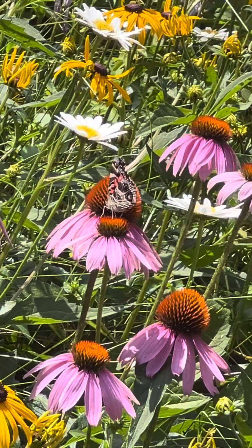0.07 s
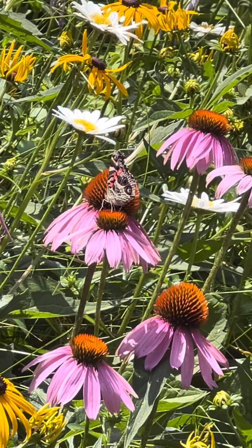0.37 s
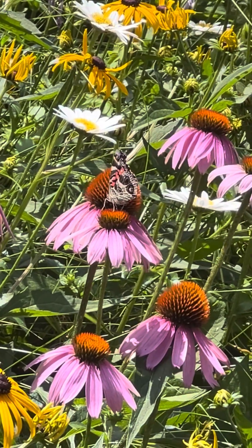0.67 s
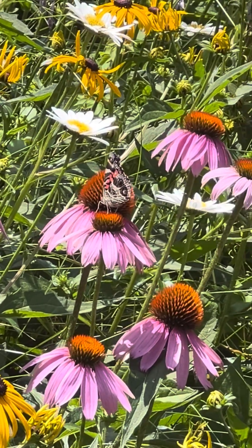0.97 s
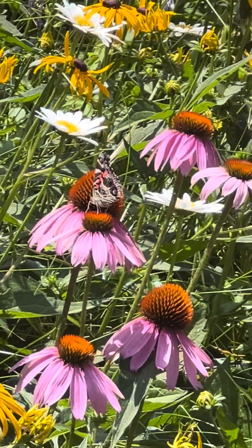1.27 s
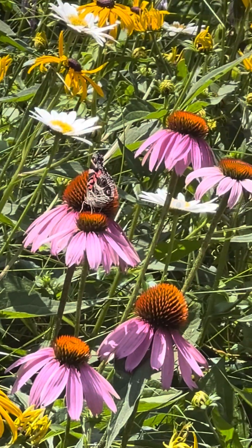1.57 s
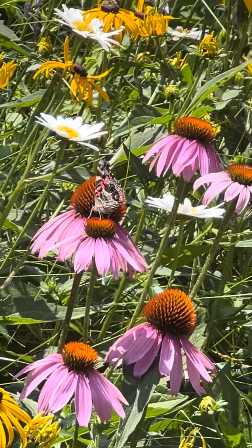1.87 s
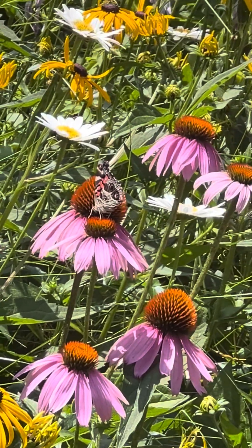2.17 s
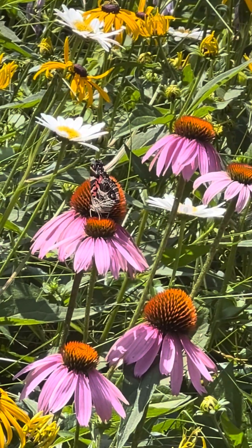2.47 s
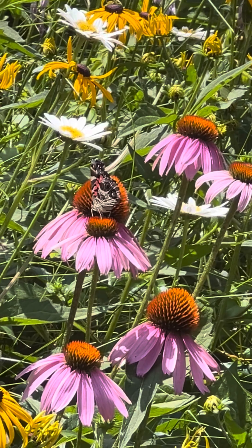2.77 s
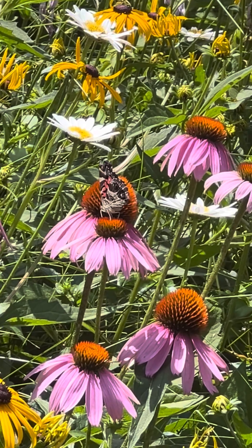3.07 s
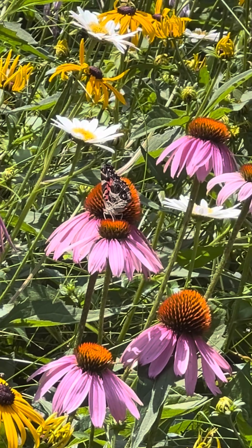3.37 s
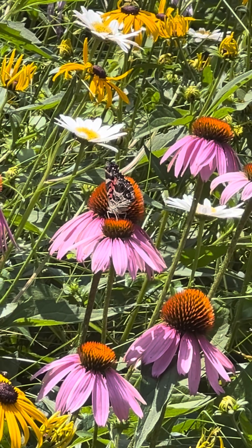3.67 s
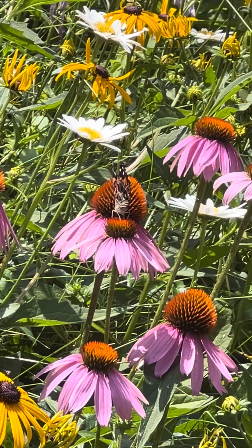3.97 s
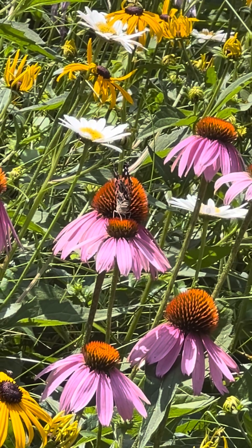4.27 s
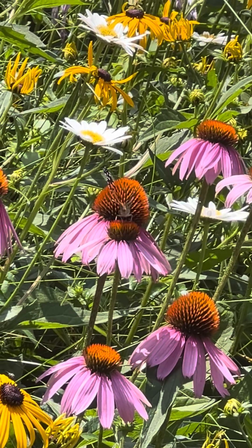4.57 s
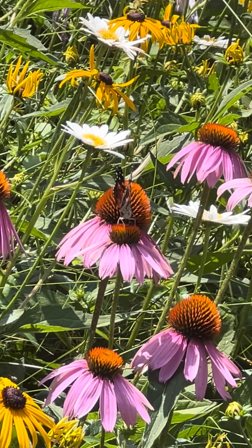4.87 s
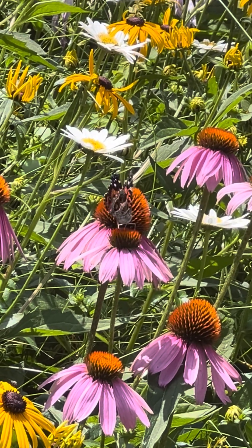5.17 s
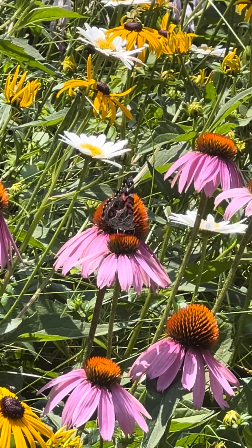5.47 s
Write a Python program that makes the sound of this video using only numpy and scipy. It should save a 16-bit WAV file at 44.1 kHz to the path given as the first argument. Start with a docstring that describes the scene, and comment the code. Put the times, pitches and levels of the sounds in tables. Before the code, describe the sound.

A cicada's high buzz slows and stops outdoors, while light wind gusts thump on the microphone over a soft hush.

```python
"""A cicada sings in a tree from the start: tymbal clicks ring its abdomen and reach a hand-held phone
by many paths through swaying leaves. A breeze buffets the microphone over a soft outdoor hush.
Near 2 s the song begins to slow and fade; something rustles close by, then the hardest gust hits.
The strokes turn ragged and stop at about 4 s, leaving wind, hush, dry snaps and two faint ticks."""
import sys
import numpy as np
from scipy import signal
from scipy.fft import rfft, irfft, next_fast_len
from scipy.io import wavfile
from scipy.ndimage import uniform_filter1d

SR = 44100
rng = np.random.default_rng(int(sys.argv[2]) if len(sys.argv) > 2 else 0)


def materialize(psi):
    """Save the field psi as 16-bit PCM at rate SR to the path in sys.argv[1].

    A 1-D psi becomes a single channel; in a 2-D psi each row is a channel.
    """
    bounded = np.clip(np.atleast_2d(psi).T, -1, 1)
    quanta = np.round(bounded * 32767).astype(np.int16)
    wavfile.write(sys.argv[1], SR, quanta)


N = 247401
TIME = np.arange(N) / SR

# tymbal stroke rate: time_s, rate_hz
STROKE_RATE = [(0, 175.2), (.7, 174.35), (1.4, 174.4), (1.8, 172.9), (2.2, 167.4), (2.8, 161.4), (3.3, 154),
               (4.05, 128)]
# song loudness: time_s, level_db
SONG_LEVEL = [(0.0, -49), (.27, -49), (.33, -50), (0.88, -51.5), (2.0, -50.5), (2.06, -53.5), (3.29, -56),
              (3.49, -58.5), (3.975, -60.5)]
# abdomen resonances, taut at full song: freq_hz, gain_db
ABDOMEN_TAUT = [(3000, -79), (4200, -33), (4900, -9.5), (5500, -5.5), (6050, -2.5), (6500, -1), (7000, 2.5),
                (7650, -2.5), (8100, 0), (8500, 1.5), (8950, -6), (10100, -8), (11500, -21), (12100, -70)]
# abdomen resonances, slack at the end: freq_hz, gain_db
ABDOMEN_SLACK = [(3000, -62), (4300, -35), (4800, -6.5), (5400, -3), (5700, -1.5), (6100, 8), (6600, 2.5),
                 (7250, -3), (8050, 4), (8800, -3.5), (10000, -8), (11400, -19.5), (12100, -51)]


def cicada(slack_hz=160, taut_hz=175, waver=.0008, flutter_db=.3, tail_t60_s=.43, right_lead_rad=1.13):
    """Rib clicks ring the abdomen, whose resonances sink as the strokes slow."""
    stroke_hz = curve(STROKE_RATE) * (1 + waver * walk(24.08))
    pulses = unit(tymbal(stroke_hz)) + undb(-16) * rng.standard_normal(N)
    tension = np.clip((stroke_hz - slack_hz) / (taut_hz - slack_hz), 0, 1)
    song = unit(tension * colour(pulses, ABDOMEN_TAUT) + (1 - tension) * colour(pulses, ABDOMEN_SLACK))
    buzz = garden(song)
    mid = buzz + ringing_partials(stroke_hz) * running_rms(buzz)
    # the two microphone ports hear the same paths out of phase, plus a few that differ
    quadrature = signal.hilbert(mid, next_fast_len(N))[:N].imag
    side = np.tan(right_lead_rad / 2) * quadrature + undb(-11) * garden(song)
    # loudness follows the insect's effort, whichever paths are open
    ports = stereo(mid, side) / running_rms(mid)
    tail_db = -60 * np.maximum(TIME - SONG_LEVEL[-1][0], 0) / tail_t60_s
    return ports * undb(curve(SONG_LEVEL) + flutter_db * walk(20) + tail_db)


# rib clicks within one stroke: offset_cycles, level_db
RIB_CLICKS = [(0, 0), (.255, -6.5), (.49, -8), (.755, -5.5)]


def tymbal(stroke_hz, tight_cycles=.0012, loose_cycles=.03, throb_cycles=.0016,
           throb_depth=.07, spread_db=1.34):
    """Each muscle stroke buckles a row of ribs, one click per rib; slower strokes keep looser time."""
    cycles = np.cumsum(stroke_hz) / SR
    stroke = np.arange(int(cycles[-1]))[:, None]
    chance = rng.standard_normal((len(stroke), 2 + len(RIB_CLICKS)))
    stroke_jitter, size_jitter, rib_jitter = np.split(chance, [1, 2], axis=1)
    slowing = (stroke_hz.max() - np.interp(stroke, cycles, stroke_hz)) / np.ptp(stroke_hz)
    scatter_cycles = tight_cycles + (loose_cycles - tight_cycles) * slowing ** 3
    offset_cycles, rib_db = np.transpose(RIB_CLICKS)
    click_cycles = stroke + offset_cycles + scatter_cycles * (stroke_jitter + rib_jitter)
    click_cycles += throb_cycles * np.interp(stroke, cycles, throb())
    sizes = undb(rib_db + spread_db * size_jitter)
    sizes *= 1 + throb_depth * np.interp(stroke, cycles, throb())
    return clicks(np.interp(click_cycles.ravel(), cycles, TIME), sizes.ravel())


def throb(rate_hz=43, spread_hz=22):
    """Uneven beating, about once in four strokes; rms 1."""
    freq_hz = np.fft.rfftfreq(N, 1 / SR)
    band = np.exp(-2 * ((freq_hz - rate_hz) / spread_hz) ** 2)
    return unit(irfft(rfft(rng.standard_normal(N)) * band, N))


# partials that stand out of the buzz: peak_s, length_s, approx_pitch_hz, level_re_buzz_db
PARTIALS = [(0.0, 0.23, 7880, -5), (0.02, .2, 6300, -10), (0.123, 0.57, 7360, -5), (0.14, 0.27, 8590, -5),
            (0.193, 0.3, 6480, -9), (0.18, 0.33, 6650, -2.5), (.22, .4, 5780, -18), (0.446, 0.52, 6820, -9),
            (0.522, 0.28, 7160, -9), (0.492, .25, 8400, -8), (0.805, 1, 8020, -5.5), (0.78, 0.3, 6100, -11),
            (.83, 0.2, 6450, -5), (1.02, 0.4, 6800, -5), (1.003, .3, 5570, -12), (1.02, .25, 7490, -7),
            (1.18, 0.36, 8370, -5), (1.27, 0.39, 5930, -12), (1.337, 0.82, 6280, -3.5),
            (1.343, .2, 6630, -3), (1.354, 0.15, 8200, -2.5), (1.4, 0.36, 5580, -14),
            (1.394, 0.83, 4880, -20), (1.5, 0.47, 7500, -4), (1.58, 0.25, 6620, -5),
            (1.696, 0.33, 8490, -13), (1.764, 0.23, 8140, -4), (1.81, .2, 5540, -9),
            (1.905, .25, 8400, -5.5), (2.442, 0.33, 6110, -9), (2.716, 0.68, 5380, -12),
            (3.205, 0.2, 5450, -8), (3.194, .3, 4950, -18)]


def ringing_partials(stroke_hz, tremble_db=1.8, tremble_cycles=.06, throb_depth=.33):
    """Where paths line up, one harmonic of the stroke rate swells into a trembling tone and fades."""
    cycles = np.cumsum(stroke_hz) / SR
    tremble = undb(tremble_db * walk(30)) * np.exp(2j * np.pi * tremble_cycles * walk(40))
    tremble *= 1 + throb_depth * (throb() + 1j * throb())
    out = np.zeros(N)
    for peak_s, length_s, approx_pitch_hz, level_db in PARTIALS:
        span = np.abs(TIME - peak_s) < length_s / 2
        harmonic = np.round(approx_pitch_hz / np.interp(peak_s, TIME, stroke_hz))
        own_tremble = np.roll(tremble, rng.integers(N))[span]
        tone = own_tremble * np.exp(2j * np.pi * (harmonic * cycles[span] + rng.random()))
        envelope = np.cos(np.pi * (TIME[span] - peak_s) / length_s)
        out[span] += undb(level_db) * envelope * unit(tone.real)
    return out


def garden(song):
    """Slowly changing paths through the tree, quicker ones through flowers, and a faint distant wash."""
    tree = foliage(song, t60_s=.075, sway_s=.2)
    flowers = undb(-5) * foliage(song, t60_s=.04, sway_s=.09)
    distance = undb(-9) * foliage(song, t60_s=.3, sway_s=.05)
    return tree + flowers + distance


def foliage(song, t60_s, sway_s):
    """As leaves sway, one spray of echoes gives way to the next, so each partial fades on its own."""
    hop = int(sway_s * SR)
    window = signal.windows.cosine(2 * hop)
    age_s = TIME[:int(t60_s * SR / 2)]
    padded = np.pad(song, (hop, 2 * hop + SR))
    out = np.zeros(len(padded))
    for start in range(0, N + hop, hop):
        paths = rng.standard_normal(len(age_s)) * decay(age_s, t60_s)
        echo = signal.fftconvolve(padded[start:start + 2 * hop] * window, paths / np.linalg.norm(paths))
        out[start:start + len(echo)] += echo
    return out[hop:hop + N]


# turbulence spectrum: freq_hz, gain_db
WIND_SPECTRUM = [(22, -19), (45, 7.5), (70, 7), (120, 1.5), (180, 0), (250, -18.5), (350, -20.5),
                 (550, -44), (1200, -82)]
# turbulence stereo width: freq_hz, side_re_mid_db
WIND_WIDTH = [(40, -12), (120, -6), (350, -3)]


def wind(breeze_db=-58.5, wander_db=2.5, rumble_trim_db=-.5):
    """Turbulence rumbles on the microphone with a wandering breeze and gusts; gusts and eddies thump."""
    turbulence = stereo_noise(WIND_SPECTRUM, WIND_WIDTH)
    breeze = undb(breeze_db + wander_db * walk(4.07))
    gust_swells, gust_thumps = gusts()
    airflow = np.linalg.norm([breeze] + gust_swells, axis=0)
    return turbulence * airflow * undb(rumble_trim_db) + gust_thumps + eddies()


# gusts on the microphone: peak_s, level_db, rise_and_fall_s
GUSTS = [(0.512, -43, 0.041), (1.194, -41.5, 0.056), (1.79, -47.5, 0.078), (2.16, -41.5, 0.062),
         (2.437, -24, 0.058), (2.653, -44.5, 0.14), (3.369, -46, 0.018), (3.701, -51, 0.25),
         (4.089, -42.5, 0.11), (4.652, -45, 0.011), (5.303, -48, 0.54), (5.591, -38.5, 0.024)]


def gusts(thump_gain_db=7, deepest_hz=64.2, db_per_octave=51):
    """Airflow envelopes, and the thump each gust lands at its peak; harder gusts thump deeper."""
    hardest_db = max(level_db for _, level_db, _ in GUSTS)
    swells, thumps = [], np.zeros(N)
    for peak_s, level_db, slope_s in GUSTS:
        swells.append(undb(level_db) * swell(peak_s, slope_s, slope_s))
        pitch_hz = deepest_hz * 2 ** ((hardest_db - level_db) / db_per_octave)
        thumps += thump(peak_s, level_db + thump_gain_db, pitch_hz)
    return swells, thumps


# lone eddies: start_s, level_db, pitch_hz
EDDIES = [(0.504, -35.5, 85), (1.046, -37, 118), (1.108, -35, 109), (1.328, -38.5, 84), (1.756, -37.5, 110),
          (2.138, -33.5, 75), (2.315, -22, 87), (2.354, -32.5, 258), (2.398, -28, 220), (2.488, -17, 99),
          (2.534, -24, 57), (2.572, -29.5, 50), (3.368, -43, 100), (4.066, -35, 280), (4.165, -37.5, 129),
          (4.649, -37, 85), (5.358, -40, 67)]


def eddies():
    """Hard eddies strike the microphone, one thump each."""
    return sum(thump(*eddy) for eddy in EDDIES)


def thump(start_s, level_db, pitch_hz, rise_cycles=.46):
    """A low pressure swing that swells and dies within a few cycles."""
    cycles = np.maximum(TIME - start_s, 0) * pitch_hz
    envelope = cycles / rise_cycles * np.exp(1 - cycles / rise_cycles)
    return undb(level_db) * envelope * np.sin(2 * np.pi * cycles)


# rustle spectrum: freq_hz, gain_db
RUSTLE_SPECTRUM = [(250, -2), (600, 4.5), (1300, -1.5), (2200, -2.5), (3000, -5.5), (5000, -14),
                   (9000, -9.5), (12000, -22), (15500, -33)]


def rustle(grain_db=3):
    """Small noises close by: one grainy noise feeds the brushing and the crackle of the snaps."""
    grains = unit(colour(rng.standard_normal(N) * undb(grain_db * walk(700)), RUSTLE_SPECTRUM))
    return snaps(grains) + brushing(grains)


# dry snaps and two faint, very high ticks: start_s, level_db, pitch_hz, ring_t60_s, crackle_re_ring_db
SNAPS = [(1.728, -41, 1800, .008, -15), (2.2675, -43, 1300, .012, -19), (2.282, -35, 2000, .009, -12),
         (2.2912, -39, 2300, .007, -4), (2.296, -23, 2000, .009, -15), (4.1042, -55, 11200, .009, -20),
         (4.7385, -38.5, 1130, .014, -23), (4.9762, -54, 11000, .009, -20), (5.47, -40, 1600, .016, -17)]


def snaps(grains, attack_s=.0005, crackle_t60_s=.012, knock_ratio=.32, knock_db=-12):
    """Each snap or tick rings briefly and crackles, over a duller knock."""
    age_s = TIME[:SR // 20]
    attack = 1 - np.exp(-age_s / attack_s)
    out = np.zeros(N)
    for start_s, level_db, pitch_hz, ring_t60_s, crackle_db in SNAPS:
        start = int(start_s * SR)
        span = slice(start, start + len(age_s))
        phase_rad = 2 * np.pi * pitch_hz * age_s
        knock = undb(knock_db) * np.sin(knock_ratio * phase_rad)
        ring = (np.sin(phase_rad) + knock) * attack * decay(age_s, ring_t60_s)
        crackle = grains[span] * decay(age_s, crackle_t60_s)
        out[span] += undb(level_db) * (ring + undb(crackle_db) * crackle)
    return out


# soft brushes: peak_s, rise_s, level_db, lowpass_hz
BRUSHES = [(2.272, .018, -51, 3000), (2.302, .016, -45, 12000), (5.485, .022, -56, 12000)]


def brushing(grains, release_s=.005):
    """Soft, grainy brushing builds up and abruptly lets go."""
    out = np.zeros(N)
    for peak_s, rise_s, level_db, lowpass_hz in BRUSHES:
        dulled = signal.sosfilt(signal.butter(2, lowpass_hz, fs=SR, output="sos"), grains)
        out += undb(level_db) * swell(peak_s, rise_s, release_s) * dulled
    return out


# outdoor hush spectrum: freq_hz, gain_db
HUSH_SPECTRUM = [(41, -18), (70, 0), (130, -9), (241, -6), (305, -14), (346, -14), (657, -20), (747, -17.5),
                 (1300, -22), (1450, -23.5), (1620, -22.5), (1820, -27), (2170, -28.5), (2740, -29.5),
                 (3800, -32), (7630, -36), (10100, -44.5), (11400, -51.5), (12300, -66), (14400, -67),
                 (15000, -100), (22000, -120)]
# stereo width the phone gives the hush, nearly mono from 2 to 4.3 kHz: freq_hz, side_re_mid_db
HUSH_WIDTH_IN_PHONE = [(60, -12), (270, -8), (600, -5), (1500, -5), (1950, -32), (4300, -38), (5200, -5),
                       (11000, -2)]
# hush balance: freq_hz, left_re_right_db
HUSH_BALANCE = [(300, 0), (600, -3.2), (1100, -3.4), (1600, -2), (1900, 0)]


def hush(level_db=-52, flicker_db=.5):
    """Distant traffic and leaves, a little to the right, flickering slightly."""
    left, right = stereo_noise(HUSH_SPECTRUM, HUSH_WIDTH_IN_PHONE)
    lean = np.sqrt(gains(HUSH_BALANCE, np.fft.rfftfreq(N, 1 / SR)))
    ports = irfft(np.array([rfft(left) * lean, rfft(right) / lean]), N)
    return ports * undb(level_db + flicker_db * walk(14))


def undb(db):
    """Decibels to gain."""
    return 10 ** (np.asarray(db) / 20)


def curve(rows):
    """Rows of (time_s, value) joined by straight lines."""
    return np.interp(TIME, *np.transpose(rows))


def swell(peak_s, rise_s, fall_s):
    """Exponential rise to 1 at peak_s, then exponential fall."""
    return np.exp(-np.maximum((peak_s - TIME) / rise_s, (TIME - peak_s) / fall_s))


def decay(age_s, t60_s):
    """Envelope falling 60 dB in t60_s."""
    return undb(-60 * age_s / t60_s)


def unit(x):
    """Scaled to rms 1."""
    return x / np.sqrt(np.mean(x ** 2))


def running_rms(x):
    """Rms over a sliding 0.1 s."""
    return np.sqrt(uniform_filter1d(x ** 2, SR // 10))


def gains(spectrum, freq_hz):
    """Gain of a (freq_hz, gain_db) spectrum at the given frequencies."""
    points_hz, points_db = np.transpose(spectrum)
    return undb(np.interp(np.log(freq_hz + 1), np.log(points_hz), points_db))


def colour(x, spectrum, taps=4096):
    """Minimum-phase filter with the given spectrum."""
    cepstrum = irfft(np.log(gains(spectrum, np.fft.rfftfreq(taps, 1 / SR))))
    cepstrum[1:taps // 2] *= 2
    cepstrum[taps // 2 + 1:] = 0
    return signal.oaconvolve(x, irfft(np.exp(rfft(cepstrum))))[:N]


def walk(rate_hz):
    """Random steps, smoothed twice; rms 1."""
    hold = int(SR / rate_hz)
    steps = np.repeat(rng.standard_normal(N // hold + 1), hold)
    return unit(uniform_filter1d(uniform_filter1d(steps, hold), hold)[:N])


def stereo(mid, side):
    """Mid and side to left and right."""
    return np.array([mid + side, mid - side])


def stereo_noise(spectrum, width):
    """Noise of a given spectrum and stereo width; mid rms 1."""
    mid, side = (unit(colour(rng.standard_normal(N), spectrum)) for _ in range(2))
    return stereo(mid, colour(side, width))


def clicks(times_s, sizes, half_taps=8):
    """Impulses placed between samples by a windowed sinc."""
    position = times_s[:, None] * SR
    index = position.astype(int) + np.arange(1 - half_taps, half_taps + 1)
    offset = index - position
    shape = np.sinc(offset) * np.cos(np.pi * offset / (2 * half_taps)) ** 2
    return np.bincount(np.clip(index, 0, N).ravel(), (sizes[:, None] * shape).ravel(), N + 1)[:N]


def scene():
    """The cicada over the garden's small noises."""
    return cicada() + wind() + rustle() + hush()


def record(dry):
    """The phone cuts rumble below 41 Hz and treble above 15.5 kHz."""
    highpass = signal.butter(4, 41, "high", fs=SR, output="sos")
    lowpass = signal.ellip(8, .2, 70, 15500, fs=SR, output="sos")
    return signal.sosfilt(lowpass, signal.sosfilt(highpass, dry))


dry = scene()
out = record(dry)
materialize(out)
```